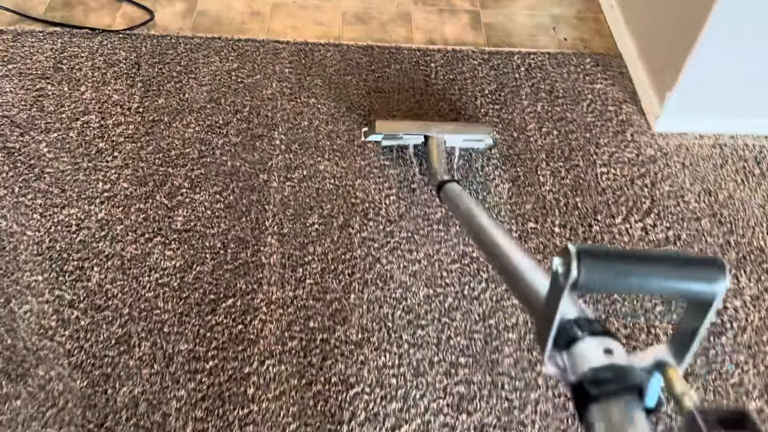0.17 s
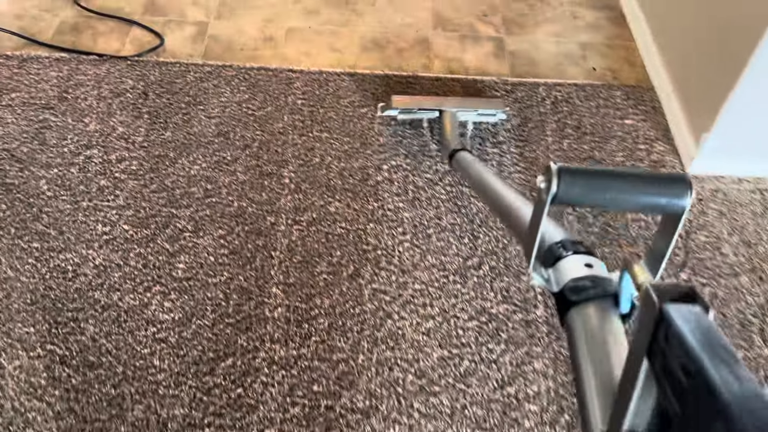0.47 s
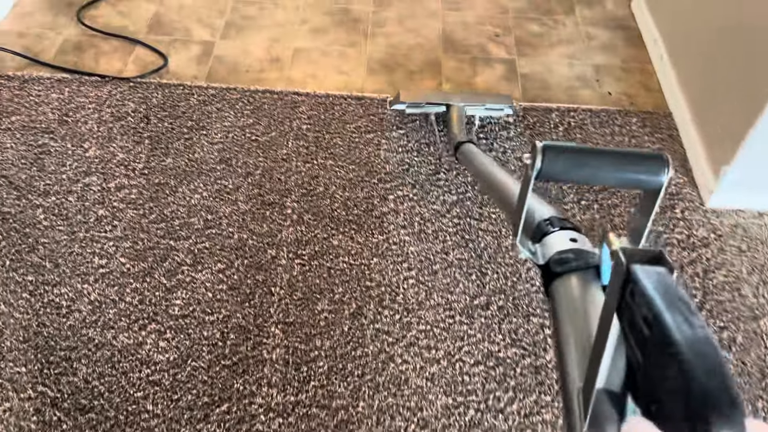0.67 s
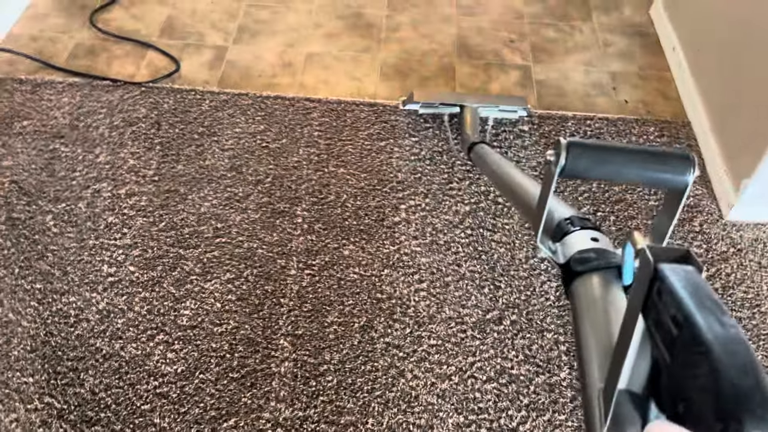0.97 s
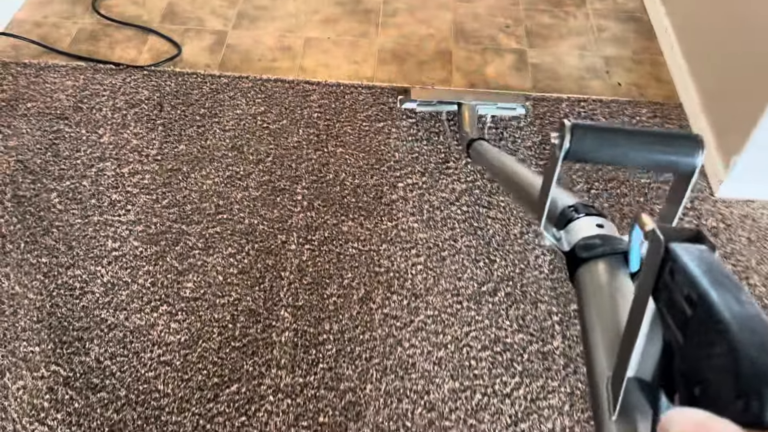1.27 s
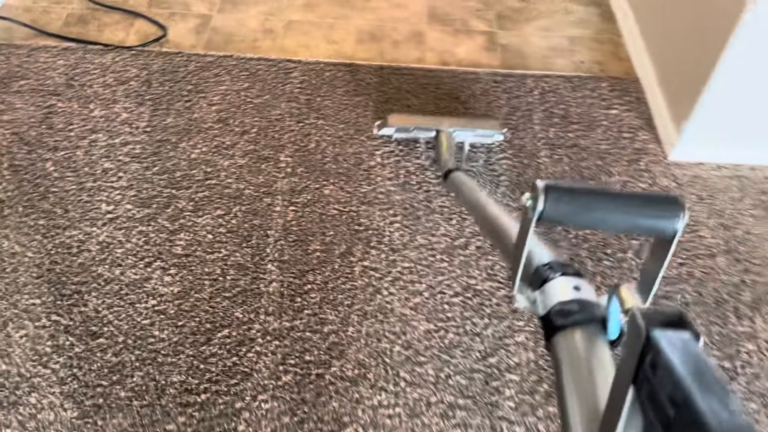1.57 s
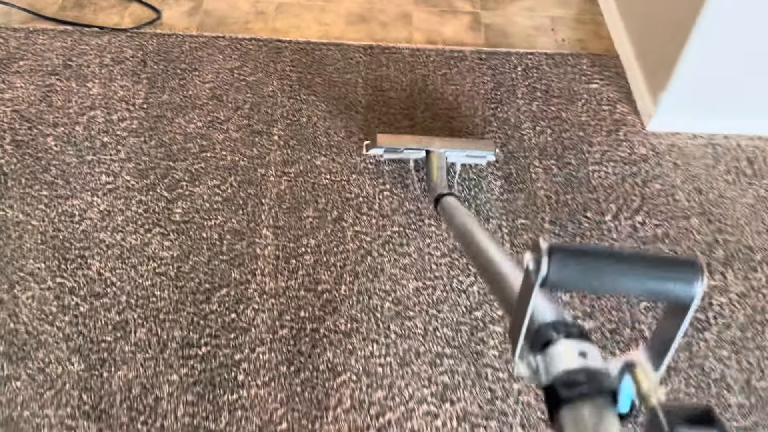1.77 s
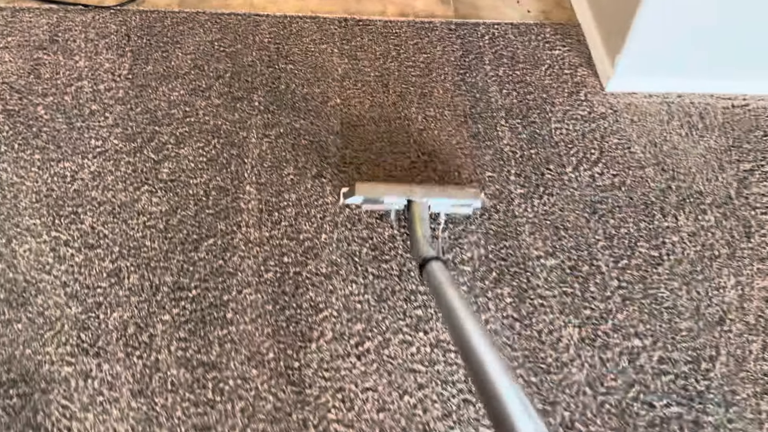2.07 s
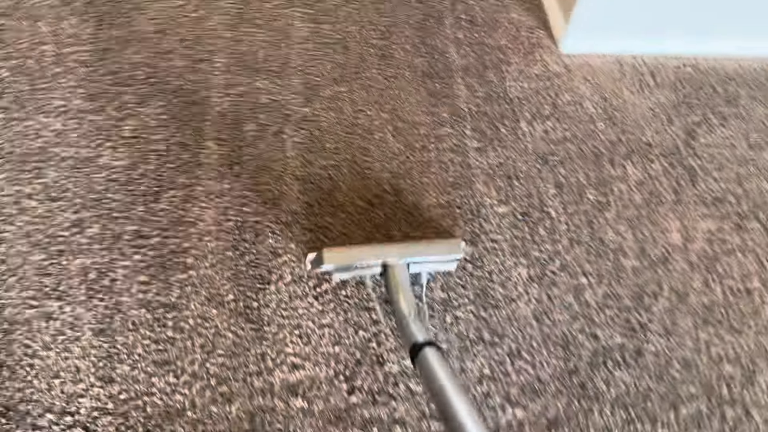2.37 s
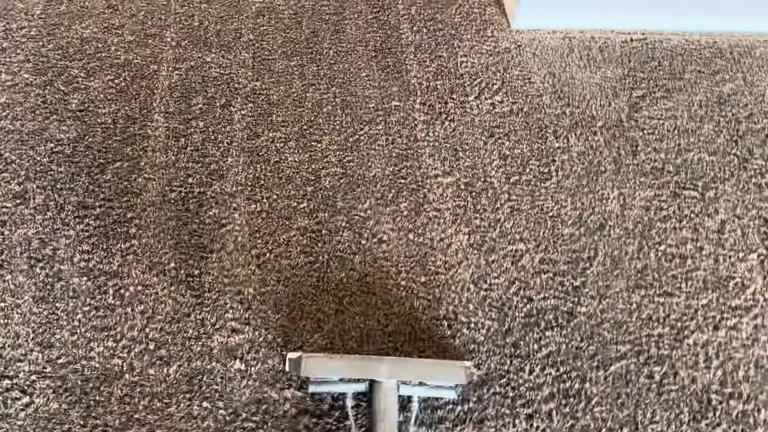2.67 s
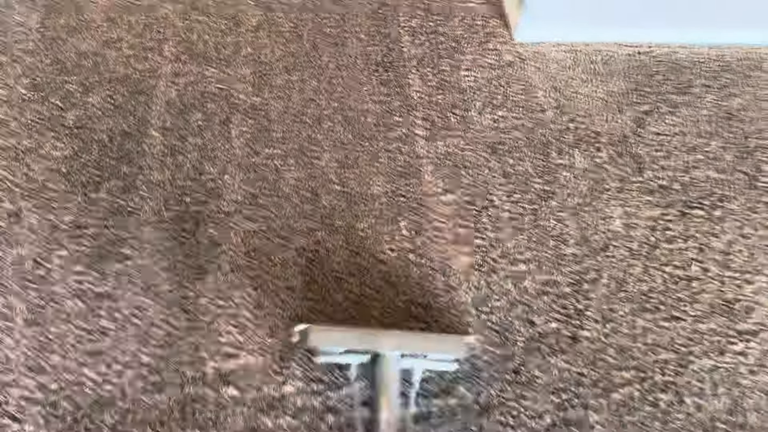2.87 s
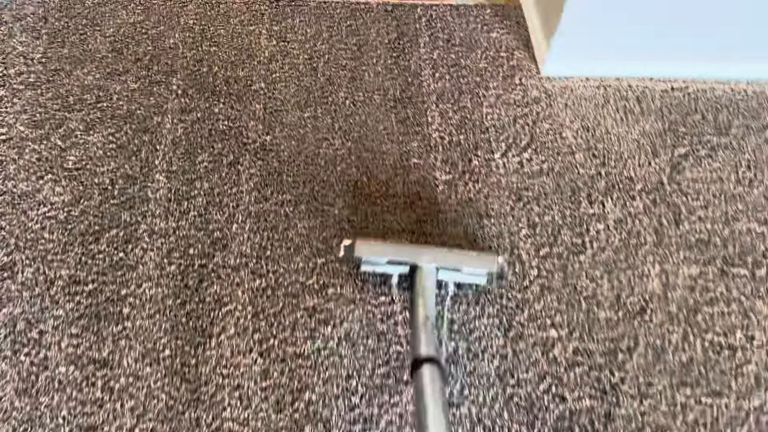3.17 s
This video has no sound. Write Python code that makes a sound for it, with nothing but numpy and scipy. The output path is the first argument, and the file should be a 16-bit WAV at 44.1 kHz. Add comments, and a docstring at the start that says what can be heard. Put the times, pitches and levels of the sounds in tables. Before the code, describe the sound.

A carpet cleaning wand hisses loudly and steadily, rasping over pile; a low thud with small bounces hits the floor edge, the rasp thins, then returns stronger on the pull back. Indoors, close handheld stereo phone.

```python
"""Air hisses through the suction slot of a carpet wand, pushed away and pulled back near a phone.
The metal lip drags and rasps over the pile, and the vacuum drones through the hose.
The head bumps once on the floor edge and bounces; brief gulps of air mark the turns of the stroke.
Airy sounds are noise shaped by spectra and level curves, the drone is a steady tone with a fuzzy part,
and the bump is a set of fading sine waves."""
import sys
import numpy as np
from scipy import signal
from scipy.io import wavfile
from scipy.ndimage import uniform_filter1d

SR = 44100
rng = np.random.default_rng(int(sys.argv[2]) if len(sys.argv) > 2 else 0)


def store_wav(level_fs):
    """Save 16-bit WAV to argv[1]."""
    pcm = np.round(np.clip(np.atleast_2d(level_fs), -1, 1) * 32767)
    wavfile.write(sys.argv[1], SR, pcm.T.astype(np.int16))


def level_to_linear(level):
    """Convert decibel levels to linear amplitude factors, elementwise."""
    exponent = np.asarray(level, float) / 20
    return 10 ** exponent


N = 146853  # length in samples

# Lip over the carpet: time_s, drag_db, rasp_db, rumble_db
STROKE_LEVELS = [(0.0, -33.5, -29.5, -35), (0.17, -34, -29.5, -34), (0.31, -30.5, -30.5, -31.5),
                 (0.49, -33, -29.5, -35.5), (0.57, -35.5, -29.5, -34.5), (0.7, -34.5, -29.5, -36),
                 (0.75, -32.5, -30.5, -24.5), (0.82, -35, -53, -33.5), (0.95, -37, -46, -39.5),
                 (1.18, -34.5, -36, -40), (1.21, -29.5, -37.5, -35), (1.34, -31, -30, -32.5),
                 (1.5, -30, -28.5, -31), (1.61, -28.5, -26, -28.5), (1.75, -32, -27.5, -30),
                 (1.78, -28, -24.5, -28.5), (2.36, -26, -26.5, -26.5), (2.45, -23, -24.5, -27.5),
                 (2.55, -29, -24.5, -27.5), (2.62, -30, -23.5, -30.5), (2.66, -38.5, -23, -40),
                 (2.73, -34, -33, -38.5), (2.76, -28, -25, -27.5), (2.8, -28, -28.5, -25.5),
                 (2.85, -31, -31.5, -35), (3.04, -33.5, -31, -32), (3.09, -28, -32, -29.5),
                 (3.19, -33, -31, -28.5), (3.3, -27.5, -32, -28.5), (3.33, -33, -35, -34)]
# Air into the slot: time_s, hiss_db, lower_edge_db, top_db
SLOT_LEVELS = [(0.0, -24, -33.5, -23), (0.09, -23.5, -36, -21.5), (0.31, -22.5, -34.5, -19.5),
               (0.64, -27, -37.5, -24.5), (1.17, -26.5, -36, -21), (1.21, -28, -35, -30),
               (1.23, -26, -35, -22), (1.61, -23.5, -37, -25), (1.63, -24.5, -34, -22),
               (1.84, -26, -31.5, -23.5), (2.37, -23.5, -31, -21.5), (2.44, -23.5, -30.5, -19),
               (2.62, -24, -28, -20.5), (2.71, -24, -32, -21), (2.79, -26, -31, -21), (2.84, -24, -29, -19),
               (2.86, -22, -26, -22), (3.08, -23.5, -28.5, -20.5), (3.3, -21, -31, -24),
               (3.33, -25, -30, -26)]
# Slow changes: time_s, air_leak_along_wand_db, deepest_bass_db
SLOW_LEVELS = [(0, -33.5, -47), (.5, -42, -39.5), (.6, -36, -54), (1.0, -34.5, -54), (1.5, -40, -56),
               (2.2, -38.5, -61), (2.65, -32, -45), (2.8, -41, -54), (2.88, -44, -42), (3.33, -32.5, -41)]
# Narrow whistling band of the slot: time_s, level_db
WHISTLE_LEVELS = [(0, -30.5), (1.0, -34.5), (1.3, -33.5), (1.6, -31), (2.0, -28.5), (2.5, -30.5),
                  (2.8, -32), (2.87, -23), (3.05, -25), (3.33, -26)]

# Noise spectra, the relative loudness at each pitch; each one has: pitch_hz, level_db
# Lip ploughing the pile
DRAG_SPECTRUM = [(150, -15), (350, -1), (600, -3), (1300, -1.5), (1800, -7), (2600, -11), (6000, -31),
                 (8500, -60)]
# Low rumble under the head
RUMBLE_SPECTRUM = [(30, -40), (60, -3), (100, -5.5), (150, -2.5), (300, -4), (450, -8.5), (900, -23)]
# Air tearing through the fibres
RASP_SPECTRUM = [(600, -16), (1500, -12), (2200, -1.5), (3400, -1.5), (4200, -3.5), (5200, -6.5),
                 (7600, -12.5), (9000, -53)]
# Air leaking along the wand
LEAK_SPECTRUM = [(300, -48), (1000, -5.5), (3000, -1), (4800, 3.5), (5800, 0), (7500, -31), (9000, -50)]
# Deepest bass
DEEP_SPECTRUM = [(20, -40), (38, -5), (48, 28), (70, -8), (110, -41)]
# Slot hiss
HISS_SPECTRUM = [(8000, -33), (9300, -6), (9900, -2), (10900, 1.5), (12500, 0), (13300, -3), (14500, -28)]
# Lower edge of the slot hiss
EDGE_SPECTRUM = [(4000, -32), (5800, -1), (6800, 3.5), (7600, 3), (8300, -3.5), (9500, -40)]
# Top of the slot hiss
TOP_SPECTRUM = [(11500, -40), (12800, -24), (13800, 3.5), (14700, 3), (15600, 2.5), (16000, -4.5)]
# Whistling band of the slot
WHISTLE_SPECTRUM = [(7700, -30), (8300, -4), (8900, 0), (9600, -2), (10400, -30)]
# Dull puff of the first blow
KNOCK_SPECTRUM = [(200, -14), (500, -4), (1300, 0), (2000, -9), (4000, -22), (8000, -60)]
# Air rushing in as the lip lifts, before each gulp's pitch factor
GULP_SPECTRUM = [(1300, -35), (2000, -0.5), (2400, 2), (3300, -3), (4200, -1), (5500, -10), (8000, -60)]

# Hose and room resonances, a negative lift being a dip: pitch_hz, width_hz, lift_db
HOSE_RESONANCES = [(107, 9.7, 4), (168, 22, 2.5), (270, 29, 7), (796, 330, 3), (1164, 36, 2.5),
                   (2160, 60, 1), (2470, 26, -6), (2495, 24, 5.5), (3630, 14, -3)]
# Two microphone ports: pitch_hz, likeness (0 to 1), left_lead_rad, left_over_right_db
PORT_PAIR = [(60, .999, 0, 0), (130, .975, 0, 0), (260, .93, .05, .5), (650, .62, .25, 1.1),
             (1100, .75, -.05, 1.8), (1700, .68, -.25, 2.2), (2200, .72, -.8, .3), (2750, .45, -.9, -1.1),
             (3400, .65, -.5, -1.2), (4500, .48, -.6, -.5), (5600, .4, -.4, -.6)]
# Bump and bounces: start_s, level_db, pitch_factor
BLOWS = [(.743, -7.5, .93), (.803, -21, 1.3), (.843, -21, .6), (.892, -20, .58)]
# Floor and wand ringing, before each blow's pitch factor: pitch_hz, level_db, fade_by_60_db_s
FLOOR_MODES = [(46, -6, .16), (82, 6, .11), (160, 2, .07), (270, -13, .1), (420, -13, .08)]
# Swells of air, pitched lower for a narrower gap: middle_s, level_db, width_s, pitch_factor
GULPS = [(1.13, -32, 0.012, 0.66), (2.61, -20, 0.036, 0.97), (2.797, -25.5, 0.023, 0.43)]

# The slot hiss at the two ports, and a pull on its left-right phase
HISS_LIKENESS, EDGE_LIKENESS = 0.97, 0.78  # 0 = unrelated, 1 = same noise
LEFT_LEAD_MS = .2247  # the slot hiss reaches the left port first
HISS_TURNS, EDGE_TURNS = .515, .62  # whole turns of phase taken off that lead
SWAY_RAD = .15  # the slot sways a little in front of the ports
LINGER_RAD, LINGER_RAD_PER_S = 0.12, 0.15  # start and growth of a pull of the left-right phase towards in step or opposed

DRONE_HZ, DRONE_DB = 67.1, -39
DRONE_WIDTH_HZ, DRONE_STEADY = 5.6, 0.8  # spread of the fuzz, steady share of the amplitude
BLOW_RISE_S = 0.0082
SAG, SAG_S = 0.515, 0.0083  # each blow starts higher by this fraction and settles at this pace
KNOCK_DB, KNOCK_FADE_S = -20.5, .24  # time to fade by 60 dB
MIC_LOW_HZ, MIC_HIGH_HZ = 37, 15900


def evened(x):
    """Scale a signal to an rms of one."""
    return x / np.sqrt(np.mean(x ** 2) + 1e-20)


def read(points, hz, order=1):
    """Read one column of a table between its points on a log-pitch axis."""
    p = np.array(points)
    return np.interp(np.log(hz + 1), np.log(p[:, 0] + 1), p[:, order])


def gain_curve(points, order):
    """Turn one dB column of a table over time into a smooth gain for every sample."""
    p = np.array(points)
    return level_to_linear(np.interp(np.arange(N) / SR, p[:, 0], p[:, order]))


def plain(points):
    """A spectrum just as its table gives it."""
    return lambda hz: read(points, hz)


def hose(points):
    """A spectrum lifted or dipped at the hose and room resonances."""
    def shape(hz):
        lift = sum(db / (1 + (2 * (hz - f) / width) ** 2) for f, width, db in HOSE_RESONANCES)
        return read(points, hz) + lift
    return shape


def air(shape, ports, size, patchy_db, flicker_db):
    """Two-port noise from random short-time spectra with drifting patches and a shared flicker."""
    hop = size // 4
    frames = N // hop + 5
    hz = np.fft.rfftfreq(size, 1 / SR)[:, None]
    t = np.arange(frames)[None] * hop / SR
    a, b, c, d, patches = rng.standard_normal((frames, len(hz), 5)).T
    # Patches are smoothed along pitch, then along time.
    patches = uniform_filter1d(patches, size=size // 64, axis=0)
    patches = evened(uniform_filter1d(patches, size=4096 // size * 3, axis=1))
    flicker = evened(uniform_filter1d(rng.standard_normal(frames), size=4096 // size * 2))
    same, lead, pan_db = ports(hz, t)
    same = np.clip(same, 0, 1)
    left = a + 1j * b
    # The right port mixes the left noise with noise of its own.
    right = same * left + np.sqrt(1 - same ** 2) * (c + 1j * d)
    z = np.array([left * np.exp(1j * lead) * level_to_linear(pan_db / 2), right * level_to_linear(-pan_db / 2)])
    z *= level_to_linear(shape(hz) + patchy_db * patches + flicker_db * flicker)
    noise = signal.istft(z, nperseg=size, noverlap=size - hop)[1]
    return evened(noise[:, :N])


def wide(hz, t):
    """Port pair for broad sounds: likeness, lead and balance depend on pitch alone."""
    return read(PORT_PAIR, hz), read(PORT_PAIR, hz, order=2), read(PORT_PAIR, hz, order=3)


def point(same, turns):
    """Port pair for the slot, a small source off to one side, so its phase lead grows with pitch."""
    def ports(hz, t):
        lead = 2 * np.pi * (hz * LEFT_LEAD_MS / 1000 - turns)
        sway = evened(uniform_filter1d(rng.standard_normal(t.shape), size=40, axis=1))
        lead = lead + SWAY_RAD * sway
        # Along pitch, the phase between left and right is pulled towards in step and opposed.
        linger = (LINGER_RAD + LINGER_RAD_PER_S * t) * np.sin(2 * lead)
        return same, lead - linger, 0 * hz
    return ports


def deep():
    """The deepest bass: low noise with a soft shudder, felt through the floor and the hand."""
    shudder = air(plain(DEEP_SPECTRUM), wide, size=4096, patchy_db=0, flicker_db=2)
    return gain_curve(SLOW_LEVELS, order=2) * shudder


def drone():
    """The vacuum's low tone: mostly a steady wave, wavering with a smaller share of narrow noise."""
    r = np.exp(-np.pi * DRONE_WIDTH_HZ / SR)
    noise = rng.standard_normal((N, 2)) @ [1, 1j]
    fuzz = signal.lfilter([1], [1, -2 * r, r * r], noise)
    fuzz = fuzz / np.sqrt(np.mean(abs(fuzz) ** 2))
    sway = DRONE_STEADY + (1 - DRONE_STEADY) * fuzz
    tone = np.exp(2j * np.pi * DRONE_HZ * np.arange(N) / SR)
    return level_to_linear(DRONE_DB) * np.sqrt(2) * (sway * tone).real


def gulp():
    """Where the stroke turns the seal breaks: brief bell-shaped swells of midrange air."""
    t = np.arange(N) / SR
    out = 0
    for middle, db, width, pitch in GULPS:
        swell = np.exp(-.5 * ((t - middle) / width) ** 2)
        spectrum = [(f * pitch, level) for f, level in GULP_SPECTRUM]
        rush = air(hose(spectrum), wide, size=1024, patchy_db=1.7, flicker_db=-0.8)
        out = out + level_to_linear(db) * swell * rush
    return out


def knock():
    """The head scuffs the floor edge: a short puff of midrange noise around the first blow."""
    t = np.arange(N) / SR - BLOWS[0][0]
    shape = level_to_linear(np.where(t < 0, t * 550., -60 * t / KNOCK_FADE_S))  # rises by 550 dB per second
    puff = air(plain(KNOCK_SPECTRUM), wide, size=512, patchy_db=8.5, flicker_db=0.0)
    return level_to_linear(KNOCK_DB) * shape * puff


def bump():
    """Each blow rings the floor modes with a soft rise, and the pitch sags as the floor settles."""
    out, t = np.zeros(N), np.arange(SR // 2) / SR
    bent = t + SAG * SAG_S * (1 - np.exp(-t / SAG_S))  # time runs fast at first
    rise = 1 - np.exp(-t / BLOW_RISE_S)
    for start, db, pitch in BLOWS:
        ring = np.zeros(len(t))
        for hz, mode_db, fade_s in FLOOR_MODES:
            ring += level_to_linear(mode_db - 60 * t / fade_s) * np.sin(2 * np.pi * hz * pitch * bent)
        k = round(start * SR)
        out[k:k + len(t)] += level_to_linear(db) * rise * ring
    return out


def rasp():
    """Air tears through the fibres at the lip, over a slowly changing leak along the wand."""
    tear = air(hose(RASP_SPECTRUM), wide, size=1024, patchy_db=2.0, flicker_db=0.53)
    leak = air(plain(LEAK_SPECTRUM), wide, size=512, patchy_db=1.0, flicker_db=.3)
    return gain_curve(STROKE_LEVELS, order=2) * tear + gain_curve(SLOW_LEVELS, order=1) * leak


def drag():
    """The lip ploughs the pile: a roar and a low rumble coloured by the hose resonances."""
    roar = air(hose(DRAG_SPECTRUM), wide, size=1024, patchy_db=1.5, flicker_db=0.0)
    rumble = air(hose(RUMBLE_SPECTRUM), wide, size=2048, patchy_db=1.0, flicker_db=-0.7)
    return gain_curve(STROKE_LEVELS, order=1) * roar + gain_curve(STROKE_LEVELS, order=3) * rumble


def slot():
    """Air rushing into the slot hisses: four overlapping bands of high noise from one small spot."""
    def band(spectrum, same, turns):
        return air(plain(spectrum), point(same, turns), size=512, patchy_db=0.57, flicker_db=1.07)
    hiss = band(HISS_SPECTRUM, HISS_LIKENESS, HISS_TURNS)
    edge = band(EDGE_SPECTRUM, EDGE_LIKENESS, EDGE_TURNS)
    top = band(TOP_SPECTRUM, HISS_LIKENESS, HISS_TURNS)
    whistle = band(WHISTLE_SPECTRUM, HISS_LIKENESS, HISS_TURNS)
    return (gain_curve(SLOT_LEVELS, order=1) * hiss
            + gain_curve(SLOT_LEVELS, order=2) * edge
            + gain_curve(SLOT_LEVELS, order=3) * top
            + gain_curve(WHISTLE_LEVELS, order=1) * whistle)


def scene():
    """Add up all the sources at the two ports."""
    return deep() + drone() + gulp() + knock() + bump() + rasp() + drag() + slot()


def band_limit(x):
    """A steep low-pass at the top of the band."""
    return signal.sosfilt(signal.butter(12, 17100, fs=SR, output="sos"), x)


def record(dry):
    """The microphone loses the deepest bass and the very top."""
    low_cut = signal.butter(3, MIC_LOW_HZ, "high", fs=SR, output="sos")
    mix = signal.sosfilt(low_cut, dry)
    high_cut = signal.firwin(1023, MIC_HIGH_HZ, window=("kaiser", 9), fs=SR)
    mix = signal.oaconvolve(mix, high_cut[None], "same")
    return band_limit(mix)


dry = scene()
out = record(dry)
store_wav(out)
```